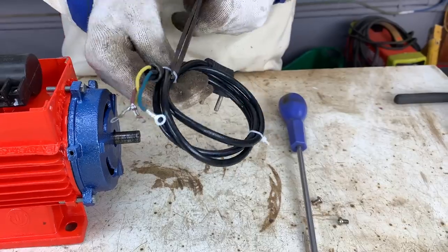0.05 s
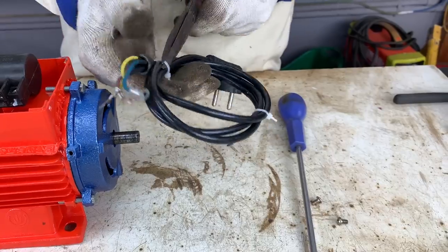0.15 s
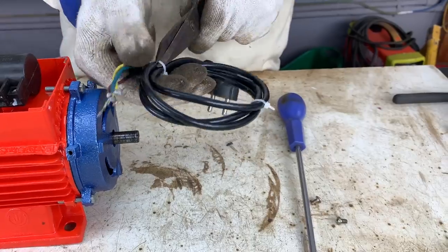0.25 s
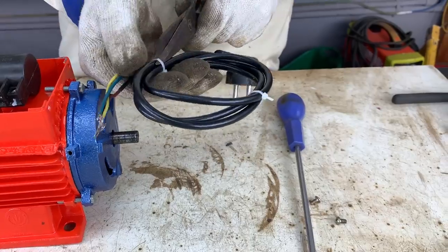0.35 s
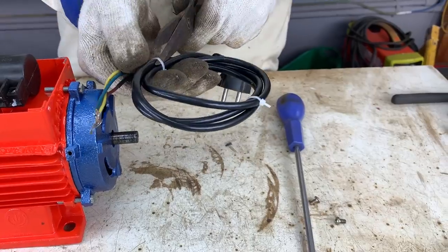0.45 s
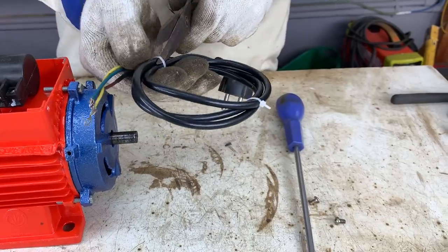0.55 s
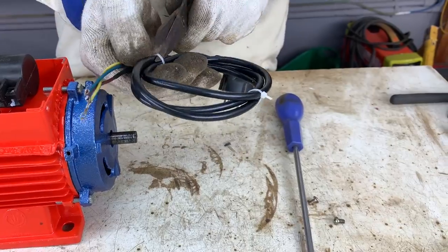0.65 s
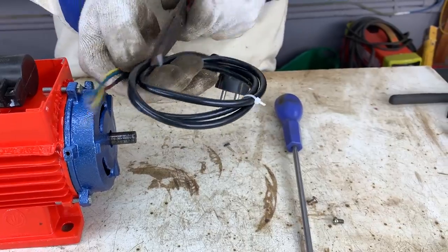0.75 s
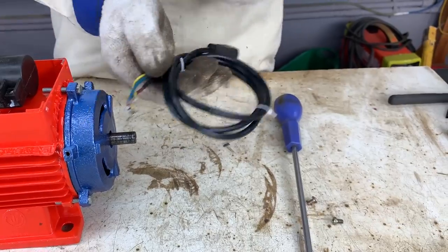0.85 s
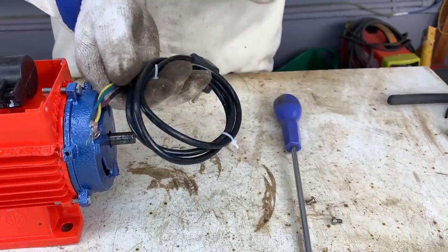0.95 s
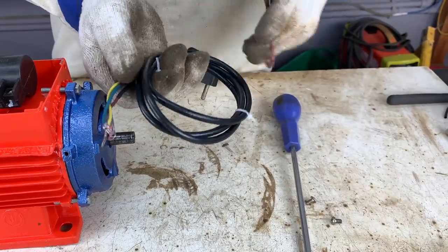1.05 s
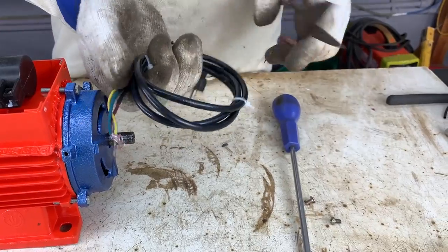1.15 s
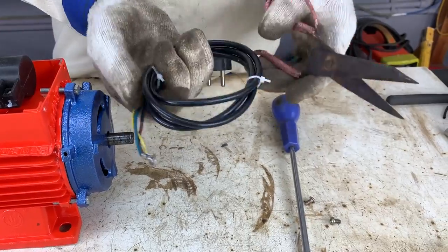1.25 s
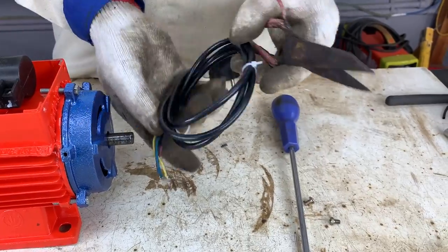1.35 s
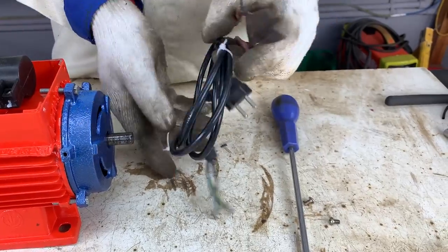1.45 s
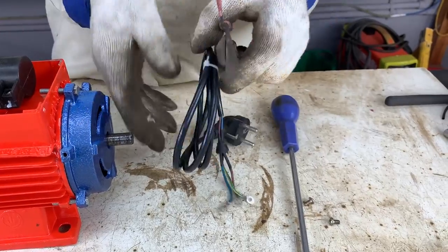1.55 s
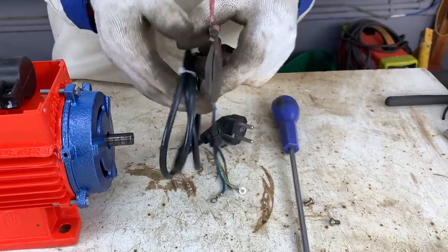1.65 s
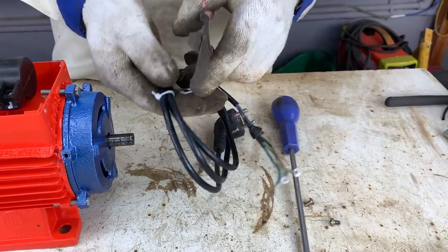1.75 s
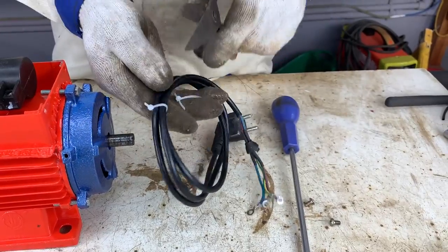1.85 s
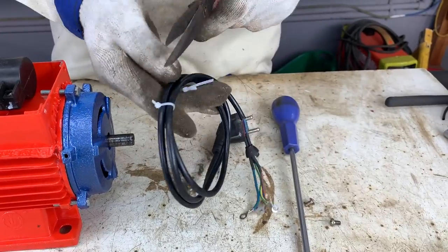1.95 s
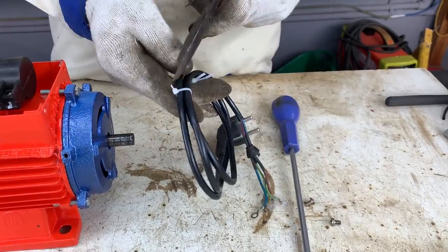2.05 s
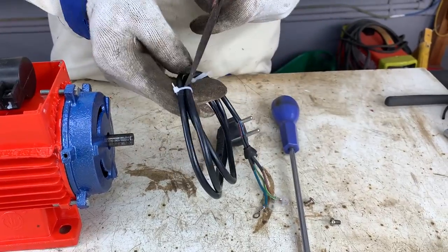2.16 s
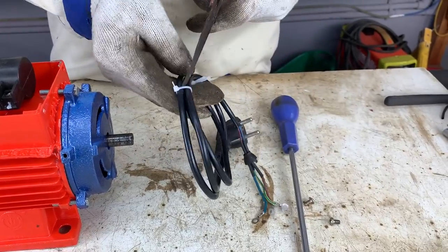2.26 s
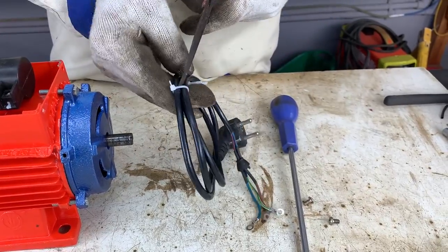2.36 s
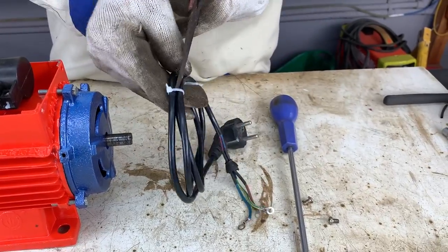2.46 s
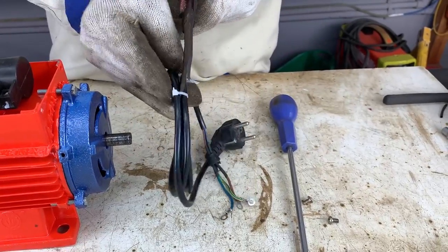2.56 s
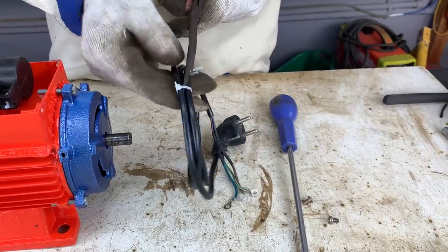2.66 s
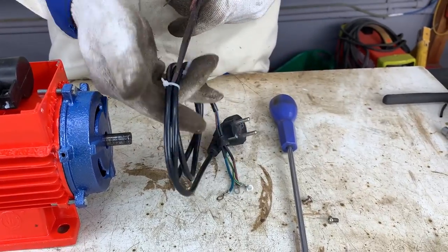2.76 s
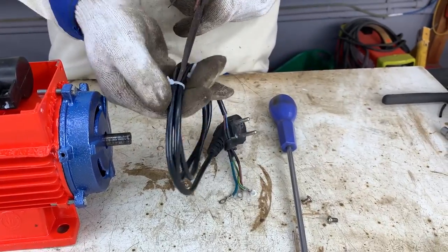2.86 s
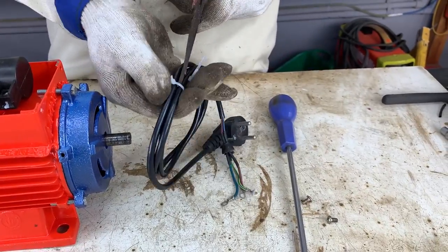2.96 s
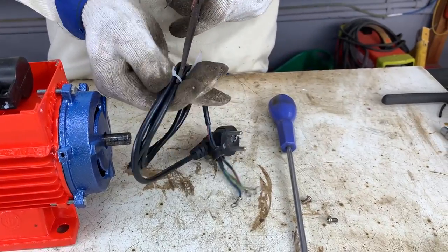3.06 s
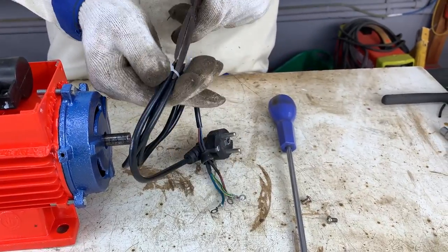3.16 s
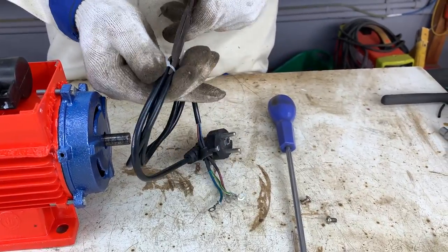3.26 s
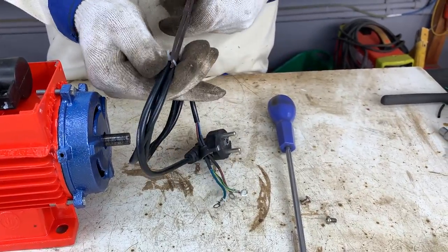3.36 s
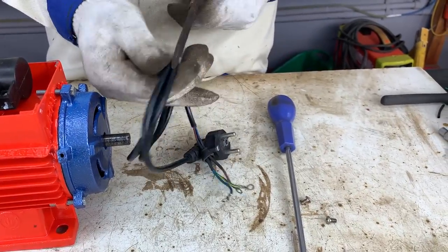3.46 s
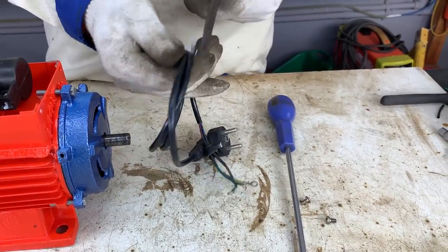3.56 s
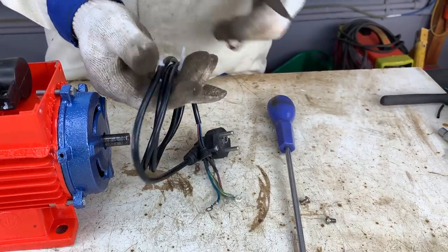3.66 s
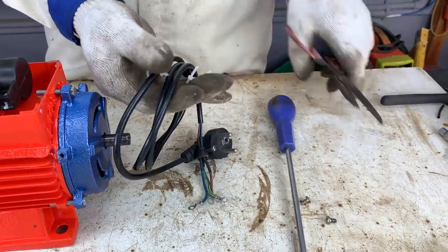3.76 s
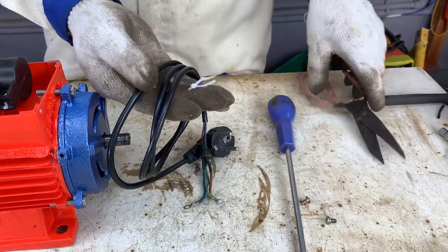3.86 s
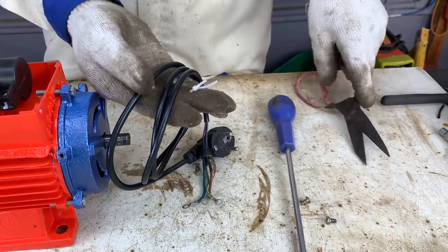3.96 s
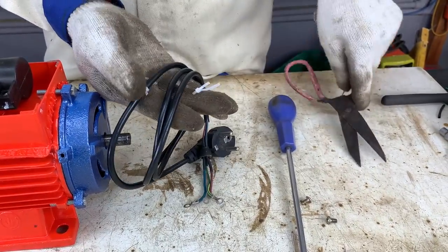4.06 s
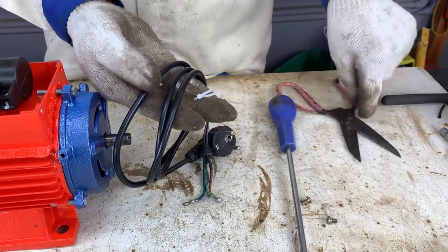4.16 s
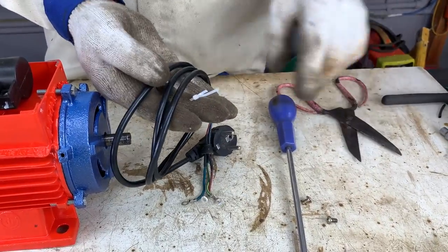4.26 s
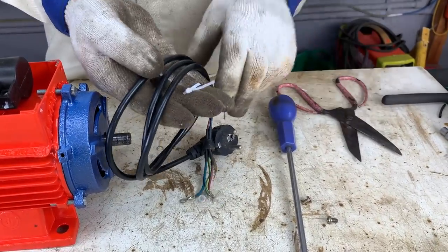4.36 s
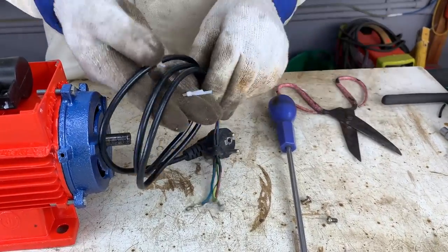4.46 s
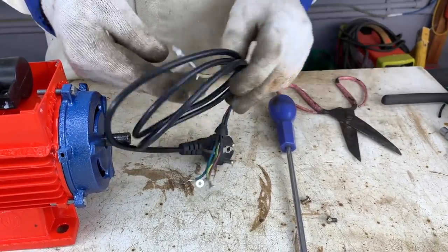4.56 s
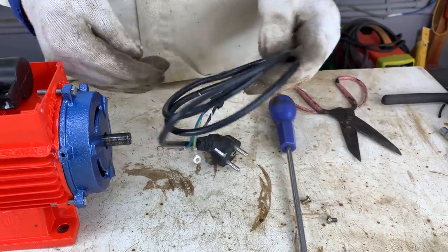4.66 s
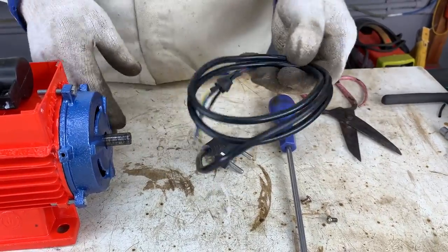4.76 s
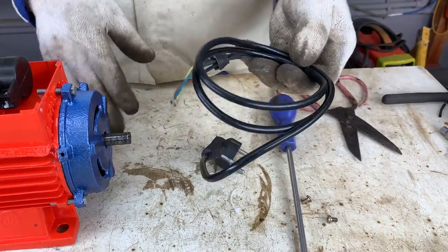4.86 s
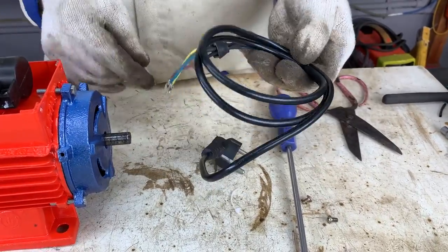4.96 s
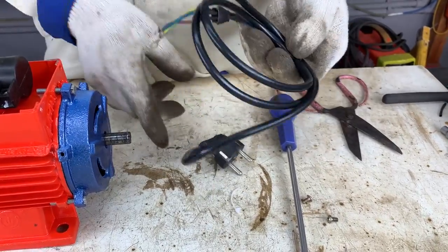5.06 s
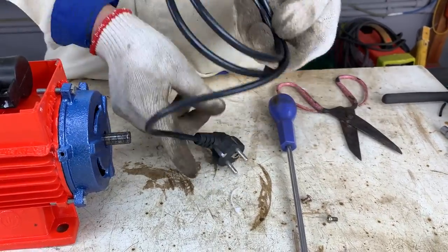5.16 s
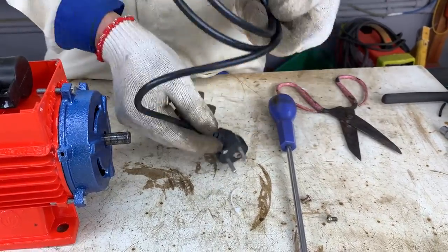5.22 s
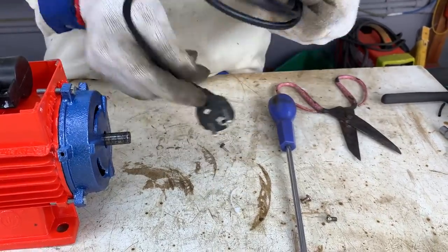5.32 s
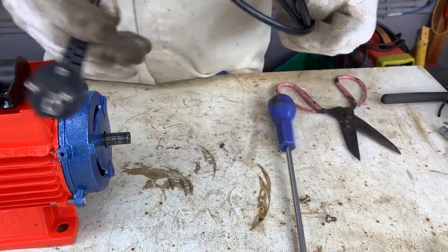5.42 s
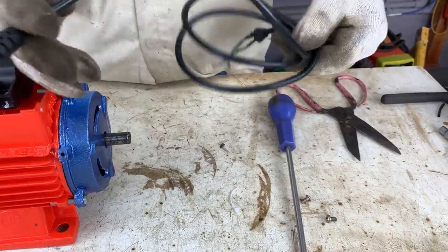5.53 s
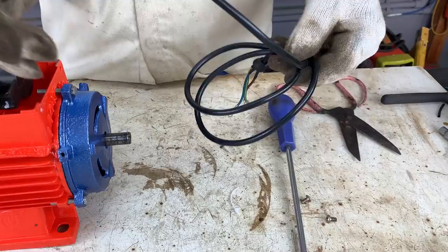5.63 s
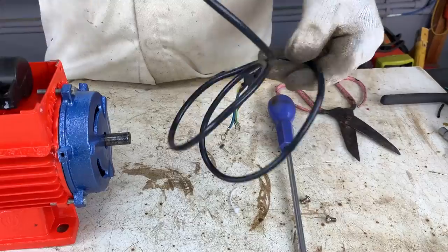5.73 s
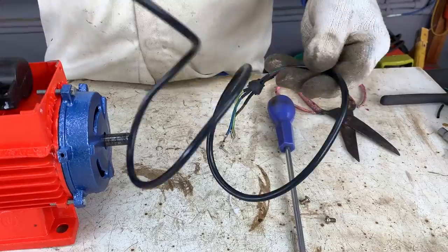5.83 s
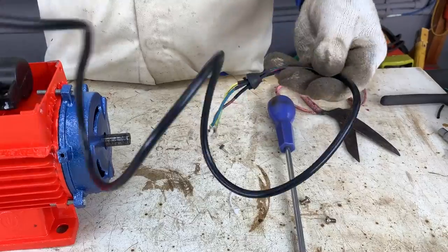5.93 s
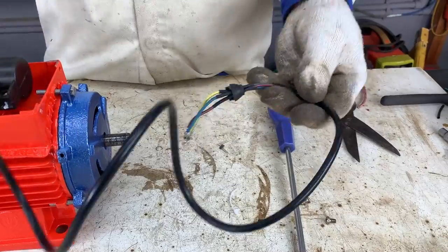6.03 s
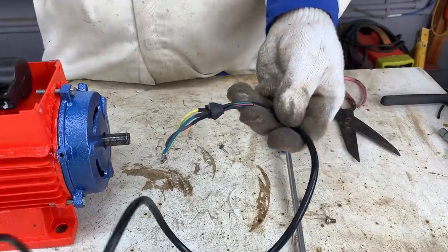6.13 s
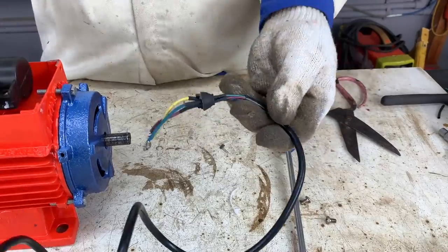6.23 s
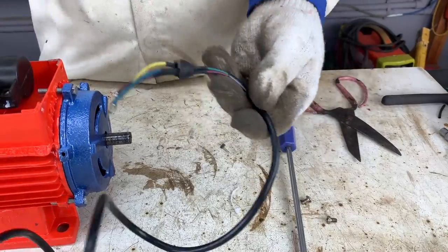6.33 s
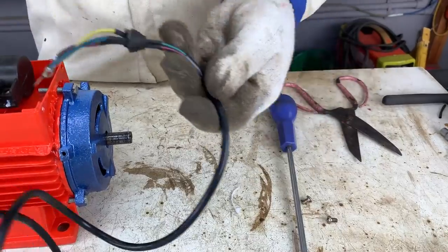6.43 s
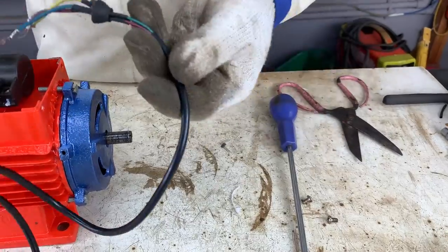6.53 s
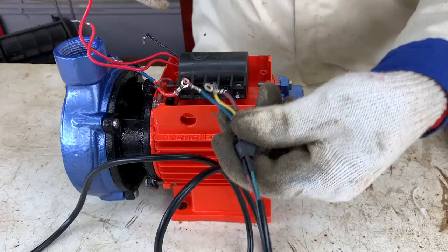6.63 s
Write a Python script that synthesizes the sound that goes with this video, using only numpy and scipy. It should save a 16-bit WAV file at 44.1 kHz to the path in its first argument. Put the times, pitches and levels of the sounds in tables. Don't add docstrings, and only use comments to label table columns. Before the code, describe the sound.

Shears snip plastic ties with bright cracks, then metal and a cord plug clack on a wooden bench over a faint machine hum.

```python
import sys
import numpy as np
from scipy import signal
from scipy.fft import rfft, irfft, next_fast_len
from scipy.io import wavfile
from scipy.ndimage import uniform_filter1d, map_coordinates

SR = 44100
rng = np.random.default_rng(int(sys.argv[2]) if len(sys.argv) > 2 else 0)


def amplitude_ratio(level_db):
    exponent = np.asarray(level_db, float) / 20
    return 10 ** exponent


def generate_wav(signal):
    frames = np.transpose(np.atleast_2d(signal))
    scaled = np.clip(frames, -1, 1) * 32767
    pcm = np.round(scaled).astype(np.int16)
    wavfile.write(sys.argv[1], SR, pcm)


N = 294994


def unit(x):
    return x / np.sqrt(np.mean(x ** 2) + 1e-20)


def along(points, hz):
    f, v = np.transpose(points)
    return np.interp(np.log(hz + 1), np.log(f + 1), v)


def wobble(rate_hz):
    knots = rng.standard_normal(int(N * rate_hz / SR) + 4)
    return map_coordinates(knots, [np.arange(N) * rate_hz / SR])


def filtered(x, response):
    m = next_fast_len(N + SR // 2)
    return irfft(rfft(x, m) * response(np.fft.rfftfreq(m, 1 / SR)), m)[..., :N]


def noise(spectrum):
    white = rng.standard_normal((2, N))
    return unit(filtered(white, lambda hz: amplitude_ratio(along(spectrum, hz))))


def during(spans, ramp_s):
    t = np.arange(N) / SR
    return sum(value * np.clip(np.minimum(t - on, off - t) / ramp_s, 0, 1) for on, off, value in spans)


def patchy(x, depth_db):
    z = signal.stft(x, nperseg=512)[2]
    field = rng.standard_normal(z.shape[1:])
    field = uniform_filter1d(field, size=4, axis=0)
    field = uniform_filter1d(field, size=8, axis=1)
    return unit(signal.istft(z * amplitude_ratio(depth_db * unit(field)), nperseg=512)[1][:, :N])


def spikes(times_s, db):
    return np.bincount(np.round(times_s * SR).astype(int), amplitude_ratio(db), N)


def ringing(modes, attack_s=0.00093):
    t = np.arange(SR // 4) / SR
    ring = sum(amplitude_ratio(db - 60 * t / t60) * np.sin(2 * np.pi * hz * t) for hz, db, t60 in modes)
    ring = ring * (1 - np.exp(-t / attack_s))
    return ring / abs(ring).max()


def struck(times_s, db, ring):
    return signal.fftconvolve(spikes(times_s, db), ring)[:N]


def burst(times_s, db, t60, spectrum, tail, wet_db, room_t60, attack_s=0.0011):
    t = np.arange(SR // 10) / SR
    shape = amplitude_ratio(-60 * t / t60) * (1 - np.exp(-t / attack_s))
    carrier = np.pad(noise(spectrum), [(0, 0), (0, len(t))]) * [[1], [.3]]
    power = np.zeros(N + len(t))
    direct = np.zeros(carrier.shape)
    for s, level, wet in zip(times_s, db, wet_db + 0 * db):
        at = slice(round(s * SR), round(s * SR) + len(t))
        crack = shape * carrier[:, at]
        direct[:, at] += amplitude_ratio(level) * crack * np.linalg.norm(shape) / np.linalg.norm(crack[0])
        power[at] += (amplitude_ratio(level + wet) * shape) ** 2
    keep = amplitude_ratio(-120 / (room_t60 * SR))
    delayed = np.pad(power, (200, 0))[:N]
    energy = signal.lfilter([1 - keep], [1, -keep], delayed)
    clumps = unit(amplitude_ratio(0.91 * wobble(110)))
    return direct[:, :N] + np.sqrt(energy) * clumps * patchy(noise(tail), depth_db=3.0)


SPLIT_HZ = 11950


def above_split(hz):
    return .5 + .5 * np.tanh((hz - SPLIT_HZ) / 30)


def raw_top(x):
    return filtered(x, above_split)


# start in seconds, top peak in dB, body in dB, bench in dB, room in dB.
SNAPS = [
    (0.8002, -17, -21, -33, 5),
    (1.0726, -21, -30, -58, -2),
    (3.1476, -52, -17.5, -24, 11),
    (3.4955, -14, -27, -36, 2),
    (3.6181, -45, -57, -30, 3),
]
# frequency in Hz, density in dB per Hz.
SNIP = [(150, -32.5), (250, -3.5), (2180, -4), (2610, -0.5), (4500, -17), (5850, -47), (9900, -120)]


def snaps():
    return hits(SNAPS, SNIP, t60=0.0085, top_db=12.0, leak_db=-29.5, port_db=-23,
                top_wet_db=-11.0, body_wet_db=-10.0, port_wet_db=-7, bench_db=1.5)


# start in seconds, top peak in dB, body in dB, bench in dB, room in dB.
TAPS = [(1.5641, -44.5, -6, -2.5, 4), (1.5823, -61, -3, 14, 4), (1.8153, -58, -24, -24.5, 5),
        (3.8966, -24, -21, -33, 0), (3.9441, -39, -15, -15, -1), (3.9654, -40, -19, -14, 1.5),
        (4.0942, -33, -19, -25, -0.5), (4.1599, -24.5, -12.5, -18, -32), (4.1673, -37, -12.5, -19, -24),
        (4.1708, -30, -14, -31, 7), (4.1853, -31.5, -43, -27, 5), (4.5444, -48, -17.5, -20, 0),
        (4.6004, -58, -2.5, -5, -7), (4.6478, -58, -10, -3, 0), (4.7862, -55, -7, -15, -1),
        (6.1478, -36, -3, -15, 1)]
# frequency in Hz, density in dB per Hz.
CRACK = [(260, -40.5), (450, -12.5), (1540, -8.5), (2170, 3), (3100, -0.5), (3970, -11), (4320, -22.5),
         (5390, -17), (6570, -37.5), (7520, -31), (8500, -23), (11000, -51), (18700, -120)]


def taps():
    return hits(TAPS, CRACK, t60=0.034, top_db=3, leak_db=-24, port_db=-28,
                top_wet_db=-8.0, body_wet_db=-5.0, port_wet_db=-5, bench_db=5)


# frequency in Hz, density in dB per Hz.
TOP = [(6880, -9), (11700, -12.5), (11900, -7), (12700, -4), (13700, -9.5), (14900, -18.5), (15900, -42),
       (16300, -42)]
LINGER = [(11500, -13), (12200, -2.5), (13300, -3.5), (14200, -12.5), (15500, -45)]
LEAK = [(2800, -37.5), (3600, 2), (6000, -3.5), (8500, -5.5), (11500, -9.5), (12200, -59.5)]
BODY = [(260, -49.5), (450, -20.5), (594, -16), (852, -10), (1050, -18.5), (1140, -1.5), (1300, -0.5),
        (1690, -20), (1860, -12), (2810, -5), (4380, -42.5), (5310, -26), (8000, -77.5), (10400, -84),
        (17600, -120)]
PORT = [(7800, -61.5), (8500, -9.5), (9200, -0.5), (9900, 4), (10600, 4), (11300, -16.5), (11900, -22),
        (12300, -78)]
BOOM = [(110, -54.5), (170, 2.5), (230, 5), (330, -6), (460, -7), (700, -50)]
# frequency in Hz, level in dB, t60 in seconds.
BENCH = [(206, 1, 0.086), (263, 3, 0.049), (323, -8.5, 0.063), (400, -25.5, 0.028)]
PORT_GROWTH = 0.69


def hits(table, crack, t60, top_db, leak_db, port_db, top_wet_db, body_wet_db, port_wet_db, bench_db):
    s, db, body, bench, room = np.transpose(table)
    top = burst(s, db + top_db, t60, TOP, TOP, top_wet_db + 0.63 * room, room_t60=0.41)
    linger = burst(s, db + top_db - 35, t60, TOP, LINGER, top_wet_db + 21.5 + 0.67 * room, room_t60=0.56)
    leak = burst(s, db + leak_db, 0.96 * t60, LEAK, LEAK, wet_db=-43.0, room_t60=0.11)
    middle = burst(s - .0015, db + body + 8.5, 0.85 * t60, crack, BODY, body_wet_db + room,
                   room_t60=0.47, attack_s=0.0027)
    whistle = burst(s, PORT_GROWTH * db + port_db, t60, PORT, PORT, port_wet_db + 1.1 * room, room_t60=0.24)
    boom = burst(s, db + bench - 0.5, t60, BOOM, BOOM, 3 + 1.3 * room, room_t60=0.25)
    wood = struck(s, db + bench + bench_db, ringing(BENCH))
    return raw_top(top + linger) + leak + middle + whistle + boom + wood * [[1], [0]]


# start in seconds, peak in dB, edge in dB.
TICKS = [(0.8004, -26, -23), (1.053, -49, -18), (1.0683, -21, -45), (1.0738, -14, -35), (1.0764, -15, -39),
         (1.0792, -20, -45), (1.0812, -15, -45), (1.084, -19, -45), (1.0865, -28, -45), (2.797, -66, -6),
         (2.84, -62, -10), (2.954, -66, 0), (2.998, -68, 0), (3.067, -66, -4), (3.082, -64, -6),
         (3.248, -66, -6), (3.256, -62, -4), (3.4944, -2, -50), (3.4956, -4, -50), (3.4975, -14, -45),
         (3.6203, -30, -40), (3.622, -31, -40), (3.8952, -27, -13), (3.901, -23, -30), (3.966, -35, -30),
         (4.0964, -31, -24), (4.1626, -25, -24), (4.1645, -26, -26), (4.1675, -28, -14), (4.1696, -26, -30),
         (4.187, -29, -30), (4.693, -64, -6), (4.8, -62, -10), (4.816, -64, -6), (4.85, -66, -6),
         (5.378, -66, -8), (5.49, -62, -6), (6.1476, -26, -16), (6.1488, -25, -16), (6.427, -62, -2)]
# frequency in Hz, density in dB per Hz.
TICK = [(11500, -8), (12300, 0), (12800, -5), (13350, 0), (14200, -9), (15200, -17), (16000, -34),
        (16600, -60)]


def ticks():
    s, db, edge_db = np.transpose(TICKS)
    top = burst(s, db + 3.5, 0.006, TICK, TICK, wet_db=-13, room_t60=0.35, attack_s=0.0006)
    edge = burst(s, db + edge_db, 0.008, LEAK, LEAK, wet_db=-9, room_t60=0.2, attack_s=0.0006)
    return raw_top(top) + edge


# frequency in Hz, level in dB, t60 in seconds.
STEEL = [(1233, 0, 0.32), (2875, -12, 0.66), (5362, -18, 0.25), (6191, -18, 0.21), (8463, 0, 0.095),
         (8635, -24, 0.65), (9249, -10, 0.19), (9421, -12, 0.32), (9577, -6, 0.42), (10760, -31, 0.05)]


def shears():
    return struck(np.array([4.161, 4.173]), [-52, -54], ringing(STEEL))


# start in seconds, peak in dB, pitch in Hz, t60 in seconds.
KNOCKS = [(1.575, -56, 210, .12), (1.745, -48.5, 220, 0.071), (0.19, -54.5, 214, 0.061),
          (1.5638, -45, 2700, 0.013), (4.162, -42.5, 1270, 0.046), (4.162, -43, 3000, 0.033),
          (3.8968, -41, 420, .05), (3.8962, -48, 1150, .025), (4.097, -58, 1200, .02),
          (3.8927, -29, 225, 0.051), (4.094, -51, 310, 0.043), (4.159, -37.5, 220, 0.037),
          (3.9635, -50, 1950, 0.022), (3.931, -48.5, 215, 0.26), (6.148, -37, 790, 0.028),
          (6.321, -46.5, 415, 0.015)]
# start in seconds, peak in dB, pitch in Hz, t60 in seconds.
MORE_KNOCKS = [(1.2955, -40, 1300, .02), (1.3025, -39, 1320, .022), (1.308, -42, 1300, .025),
               (1.568, -46, 1200, .04), (1.5795, -54, 2900, .012), (1.581, -54, 1900, .012),
               (1.587, -57, 2900, .012), (1.5935, -57, 2800, .012), (1.603, -57, 2500, .012),
               (1.616, -61, 2500, .012), (1.744, -62, 2600, .015), (3.895, -40, 2930, .012),
               (3.944, -55, 1320, .03), (3.9445, -51, 2400, .015), (3.954, -56, 2600, .012),
               (4.0955, -52, 1940, .03), (4.159, -40, 2800, .012), (4.1673, -38, 3000, .014),
               (4.189, -49, 1300, .03), (4.2015, -53, 2300, .015), (5.772, -44, 1150, .025),
               (5.774, -60, 2800, .03), (6.1468, -30, 3100, .009), (6.158, -40, 1250, .025),
               (6.1625, -44, 2900, .015), (6.165, -42, 1500, .02), (6.169, -43, 2100, .015),
               (6.178, -42, 1350, .03), (6.192, -46, 1250, .02), (6.202, -46, 1300, .025),
               (6.2195, -48, 1830, .04), (6.245, -50, 1350, .03), (6.299, -54, 1350, .02)]


def knocks():
    bench = np.zeros(N + SR)
    for s, db, hz, t60 in KNOCKS + MORE_KNOCKS:
        ring = ringing([(hz, 0, t60)])
        bench[round(s * SR):][:len(ring)] += amplitude_ratio(db) * ring
    return bench[:N]


# frequency in Hz, density in dB per Hz.
FLOOR_RING = [(290, -49), (550, -15), (1000, -13.5), (1300, -2), (1900, -3), (2840, -8), (4200, -50),
              (9240, -120)]


def plug():
    drop_s, drop_db = np.array([6.1478]), np.array([-39])
    return burst(drop_s, drop_db, 0.029, FLOOR_RING, FLOOR_RING, wet_db=9, room_t60=0.58)


# start in seconds, peak in dB, pitch in Hz, t60 in seconds.
PIN = (6.1473, -25.5, 2090, .013)


def pin():
    s, db, hz, t60 = PIN
    return struck(np.array([s]), [db], ringing([(hz, 0, t60)])) * [[.55], [1]]


# start in seconds, peak in dB, thud in dB, knock in dB, click in dB.
BUMPS = [(0.189, -52, -11.5, -24, -27.5), (0.425, -65.5, 6.5, -26, -14), (1.292, -36, -7.5, -40, -39),
         (1.744, -49, -30.5, -25, -8), (2.647, -57, -26, -10.5, 5), (3.005, -54.5, -1, -17.5, 2),
         (3.088, -62.5, -2, -2.5, -8), (3.692, -72, -10, 0, -31), (3.776, -80, 0, -11, -51),
         (4.469, -61.5, -2.5, -26, -4), (4.564, -49, -13.5, -15.5, -7), (5.412, -65, -10, -16, -12),
         (5.619, -40, 4, -31, -55), (5.669, -47.5, -25, -11, -45), (5.765, -40.5, -15, -22, -31),
         (6.1465, -33, -12, -3, -28), (6.319, -43.5, -24, -27.5, -38), (6.42, -56, -16, -13.5, -10),
         (6.5833, -25, -14.5, -24.5, -11)]
# start in seconds, length in seconds, level in dB, fizz in dB.
RUBS = [
    (1.2895, 0.028, -45.5, 5),
    (5.766, 0.024, -45.5, -16),
]
# frequency in Hz, density in dB per Hz.
RUB = [(130, -12.5), (220, -9), (300, -27.5), (525, -20), (1290, -8), (1710, -23.5), (2810, -26),
       (4210, -41), (6100, -40.5), (7470, -46), (9000, -43.5), (11700, -60), (19800, -120)]
FIZZ_HZ = 4000


def stand():
    s, db, thud, knock, click = np.transpose(BUMPS)
    click = click + np.where(db > -45, 12, -8)
    thud_ring = ringing([(104.6, 0, 0.032)], attack_s=0.0021)
    knock_ring = ringing([(259, -3, 0.03), (667, -1.5, 0.0074)], attack_s=0.0027)
    click_ring = ringing([(780, 2.5, 0.012), (1320, 32.5, 0.0022), (2660, -9.0, 0.022)], attack_s=0.00066)
    pushes = struck(s - .004, db + thud + 9, thud_ring)
    pushes = pushes + struck(s, db + knock + 11, knock_ring) + struck(s, db + click, click_ring)
    rub = noise(RUB)
    dull = filtered(rub, lambda hz: hz < FIZZ_HZ)
    rubs = np.zeros((2, N))
    for start, length, level_db, fizz_db in RUBS:
        gain = during([(start, start + length, amplitude_ratio(level_db))], ramp_s=0.003)
        rubs += gain * (dull + amplitude_ratio(fizz_db) * (rub - dull))
    return pushes * [[1], [0]] + rubs * [[1], [.4]]


# start in seconds, length in seconds, rustle in dB, scrape in dB.
HANDS = [(0.0, 0.011, -91, -86), (0.12, 0.022, -83, -81), (0.212, 0.15, -83, -74.5),
         (0.551, 0.017, -84, -75.5), (0.564, 0.11, -69.5, -86.5), (1.36, 0.035, -87, -95),
         (1.43, 0.029, -84, -99), (1.62, 0.014, -85, -66.5), (1.70, 0.069, -75.5, -88),
         (1.821, 0.08, -69.5, -64.5), (2.44, 0.016, -87, -86), (2.56, 0.027, -89, -90),
         (2.66, 0.05, -92, -76), (2.78, .03, -73, -89), (2.835, 0.081, -70.5, -96), (2.95, 0.044, -81, -84),
         (3.07, 0.073, -79, -81.5), (3.135, 0.17, -73, -81), (3.39, 0.013, -81.5, -76.5),
         (4.69, 0.041, -83, -94), (4.79, 0.017, -82, -76.5), (5.035, 0.035, -79, -96),
         (5.12, .06, -81, -87), (5.29, 0.017, -98, -85), (5.374, .04, -75, -85), (5.45, 0.12, -79, -80),
         (5.97, 0.016, -94, -83)]
STROKE_RISE_S, STROKE_SAG_DB_PER_S = 0.004, 33.5


def strokes(level_db, fade_db_per_s):
    s, length = np.transpose(HANDS)[:2, :, None]
    t = np.arange(0, N, 32) / SR - s
    fall_db = STROKE_SAG_DB_PER_S * np.clip(t, 0, length) + fade_db_per_s * np.maximum(t - length, 0)
    gain = amplitude_ratio(level_db[:, None] - fall_db) * np.clip(t / STROKE_RISE_S, 0, 1)
    return np.repeat(np.linalg.norm(gain, axis=0), 32)[:N]


def hands():
    rustle_db, scrape_db = np.transpose(HANDS)[2:]
    grain = unit(amplitude_ratio(2.4 * wobble(86)))
    scrape = noise([(400, -50.5), (750, -7.0), (1150, -1.0), (1600, -18.5), (2600, -14.5), (4000, -58.5)])
    rustle = raw_top(grain * noise(TOP))
    return strokes(rustle_db, fade_db_per_s=201) * rustle + strokes(scrape_db + 2.0, fade_db_per_s=150.5) * scrape


# time in seconds, rumble in dB.
LOAD = [(0.0, -66), (0.69, -74), (1.25, -69), (1.47, -68), (2.92, -75), (3.16, -69.5), (4.17, -71.5),
        (4.3, -75.5), (5.38, -72.5), (5.58, -70.5), (6.4, -74), (6.68, -63.5)]
# frequency in Hz, density in dB per Hz.
RUMBLE = [(15, -28.5), (25, -13), (49, 0), (86, -5.5), (118, -3), (162, -8), (200, -7.5), (271, -18.5),
          (500, -26.5), (650, -38.5), (1100, -120)]
AIR = [(240, -7), (400, -5.5), (654, -10.5), (693, -14), (943, -7.5), (1030, -12.5), (1070, 0),
       (1560, -25.5), (2470, -2.5), (3080, -12.5), (4000, -53.5), (5200, -49.5), (8800, -120)]
# on in seconds, off in seconds, swell in dB.
HUM_SWELLS = [
    (0.2, .5, 11.5),
    (0.8, 1.0, 17.5),
    (2.18, 2.42, 17.5),
    (3.0, 3.47, 10),
    (5.38, 5.55, 12),
]
# on in seconds, off in seconds.
MOTOR_ON = [
    (0.75, 1.12),
    (2.3, 2.86),
    (4.65, 6.5),
    (6.42, 9),
]
SWELL_DB = 1.1


def workshop():
    t = np.arange(N) / SR
    load_s, load_db = np.transpose(LOAD)
    rumble_db = np.interp(t, load_s, load_db)
    rumble = amplitude_ratio(rumble_db + 3 + 3.0 * wobble(11)) * noise(RUMBLE)
    hum_db = rumble_db - 8 + during(HUM_SWELLS, ramp_s=0.059) + 1.7 * wobble(4)
    hum_hz = 120 + 2.5 * wobble(4.6)
    hum = amplitude_ratio(hum_db) * np.sin(2 * np.pi * np.cumsum(hum_hz) / SR)
    running = during([(on, off, 1) for on, off in MOTOR_ON], ramp_s=0.051)
    motor_db = -79.5 - 19.5 * (1 - running) + SWELL_DB * wobble(14)
    motor = amplitude_ratio(motor_db) * np.sin(2 * np.pi * (1096 * t + .1 * wobble(11)))
    air = amplitude_ratio(-76.5 + SWELL_DB * wobble(8.7)) * noise(AIR)
    whine_db = -77 + 1.7 * wobble(0.88) + SWELL_DB * wobble(14)
    whine = amplitude_ratio(whine_db) * patchy(noise(PORT), depth_db=2.5)
    return rumble + air + whine + (hum + motor) * [[1], [0]]


# frequency in Hz, likeness from 0 to 1.
ALIKE = [(900, 1), (1400, 0.96), (2200, 0.13), (3400, 0.35), (4200, 0.69), (8200, 0.38), (9200, 0.73),
         (11500, 0.18), (14000, 0.3)]
# frequency in Hz, lead of the left in radians.
LEAD = [(1300, 0), (1900, 1.6), (2400, 4.3), (2900, 5.2), (3400, 5), (3900, 3.2), (5000, 3.1), (5400, 0),
        (6800, 0), (7200, 3.1), (8200, 3.1), (8700, 6.1), (9600, 6.8), (10700, 9.4), (12200, 11)]


def ports(paths, share=1):
    def mix(hz):
        alike = np.clip(along(ALIKE, hz), 0, 1) * np.where(hz > 1500, share, 1)
        turn = np.arccos(alike) / 2
        return np.array([np.cos(turn), np.sin(turn)])

    main, other = filtered(paths, mix)
    sides = np.array([main + other, main - other])
    return filtered(sides, lambda hz: np.exp(.5j * along(LEAD, hz) * [[1], [-1]]))


# shut in seconds, open in seconds, depth in dB.
DUCKS = [
    (1.325, 1.557, -14),
    (1.594, 1.723, -11.5),
    (5.787, 5.919, -31),
    (6.593, 6.8, -12.5),
]


def ducking():
    t = np.arange(N) / SR
    return amplitude_ratio(sum(db * np.clip(np.minimum((t - shut) / 0.0035, (opened - t) / 0.012), 0, 1)
                   for shut, opened, db in DUCKS))


TOP_HZ = 15800


def starved(x, floor_db, greed):
    hz, _, z = signal.stft(np.array([x[0] + x[1], x[0] - x[1]]) / 2, SR, nperseg=1024)
    band = (hz // 520).astype(int)
    band_starts = np.flatnonzero(np.diff(band, prepend=-1))
    power = np.add.reduceat(abs(z) ** 2, band_starts, axis=1) / 12
    power_db = uniform_filter1d(10 * np.log10(power + 1e-20), size=3, axis=2)
    loud_db = np.clip(power_db[:, 23:28].mean(axis=(0, 1)) - floor_db, 0, 30)
    top_power = power[:, 23:28].mean(axis=(0, 1))
    sudden = np.diff(np.log10(top_power + 1e-20), prepend=0) > 1
    clicks = np.convolve(sudden, [1, 1, 1], "same") > 0
    kept = (power_db[:, band] > floor_db + greed * loud_db) | (hz < 3600)[:, None] | clicks
    total, apart = signal.istft(z * kept * (hz < TOP_HZ)[:, None], SR, nperseg=1024)[1][:, :N]
    return np.array([total + apart, total - apart])


def scene():
    contacts = snaps() + taps() + ticks()
    dry_knocks = (shears() + knocks()) * [[1], [0]]
    return ports(contacts + dry_knocks + plug() + stand() + hands() + workshop()) + pin()


def band_limit(x):
    return signal.sosfilt(signal.butter(12, 16480, fs=SR, output="sos"), x)


# frequency in Hz, level in dB.
HISS = [(300, -120), (600, 6), (3500, -3), (8000, -6), (12000, -1.5), (13200, -9.5), (13800, -20),
        (16000, -50.5)]
END_S = 6.682


def record(dry):
    def phone(hz):
        tilt = amplitude_ratio(above_split(hz) * [[-14], [5]]) / (1 + (50 / (hz + 1)) ** 4)
        smear = np.exp(-2j * np.pi * 2.0 * np.log((np.minimum(hz, 9000) + 30) / 9000))
        return tilt * smear

    x = filtered(dry, phone)
    gain = ducking()
    processed = filtered(x, lambda hz: (1 - above_split(hz)) / (1 + (450 / (hz + 1)) ** 4))
    x = x + (gain - 1) * processed
    hiss = gain * ports(noise(HISS)) + np.sqrt(abs(1 - gain ** 2)) * ports(noise(HISS), share=0.33)
    x = starved(x + amplitude_ratio(-79) * hiss, floor_db=-116.5, greed=.16)
    x = x * np.clip((END_S - np.arange(N) / SR) / 0.0031, .05, 1)
    return band_limit(x)


dry = scene()
out = record(dry)
generate_wav(out)
```